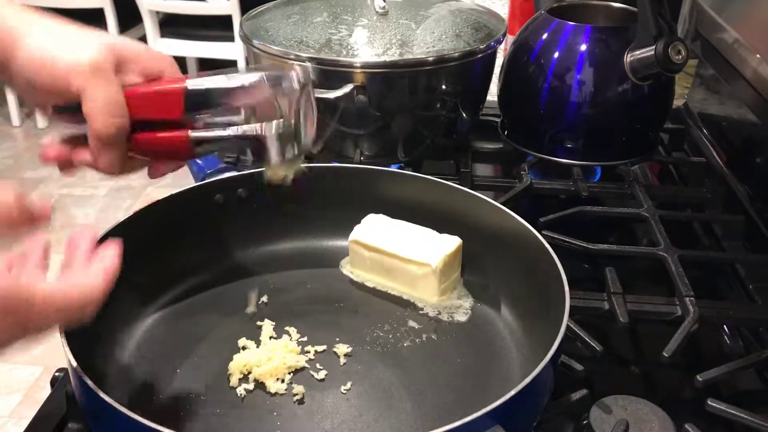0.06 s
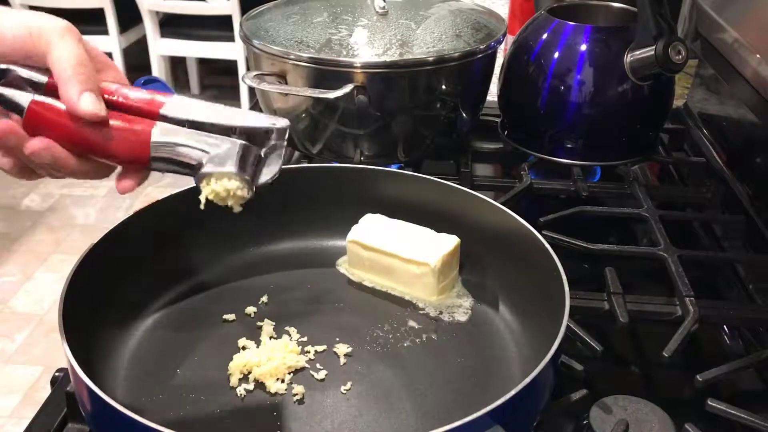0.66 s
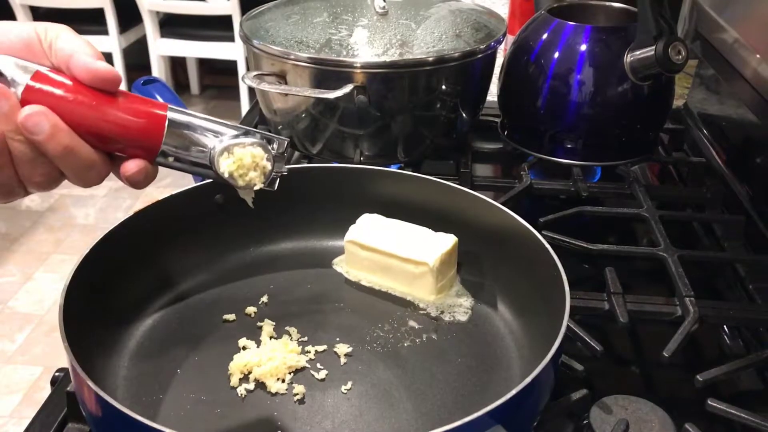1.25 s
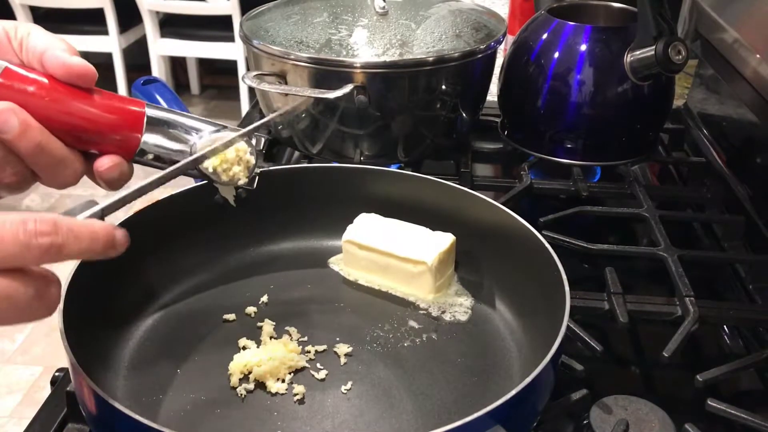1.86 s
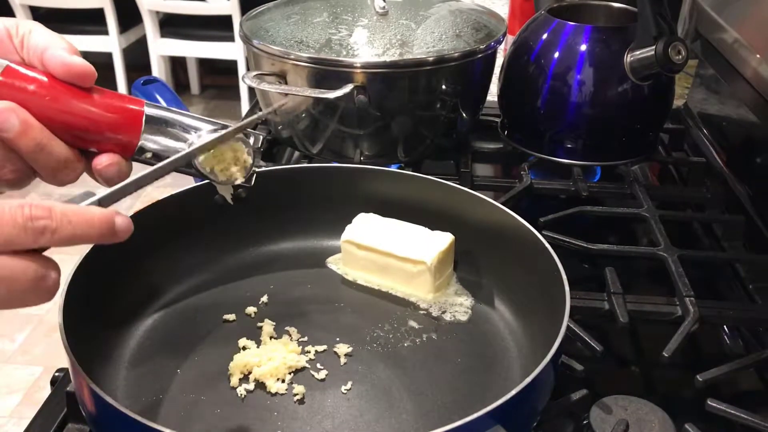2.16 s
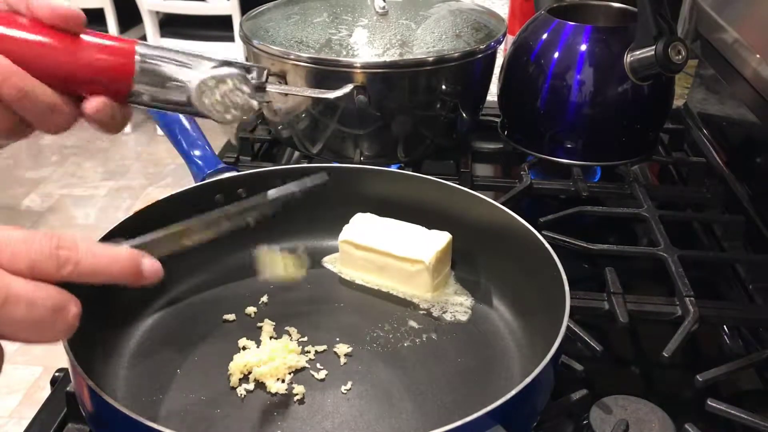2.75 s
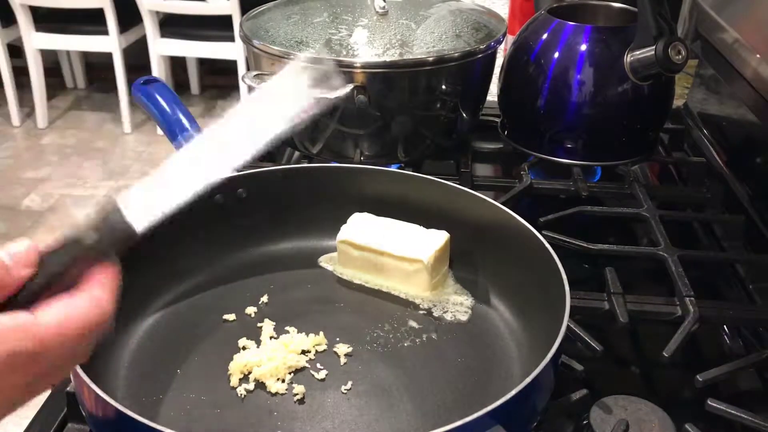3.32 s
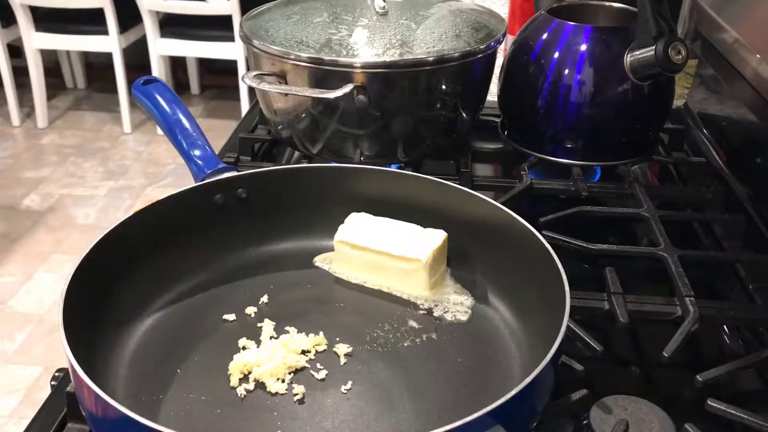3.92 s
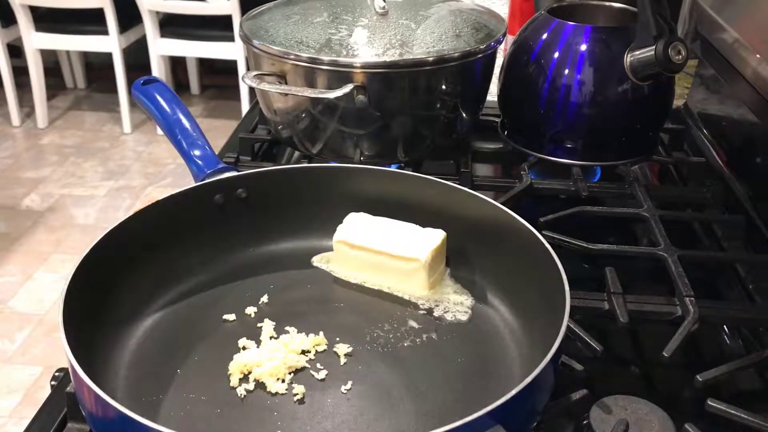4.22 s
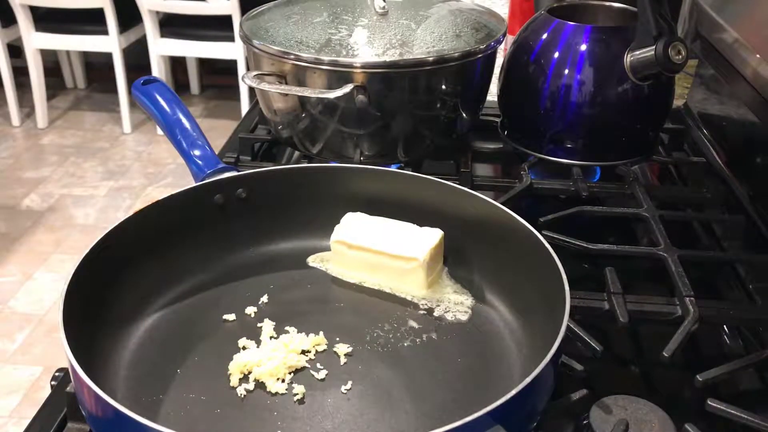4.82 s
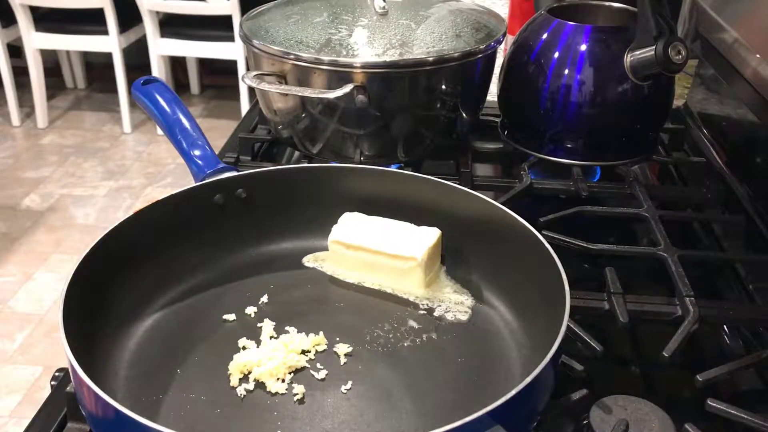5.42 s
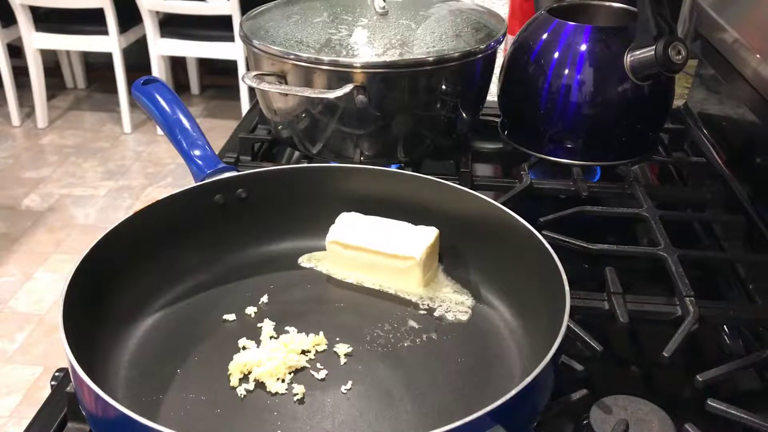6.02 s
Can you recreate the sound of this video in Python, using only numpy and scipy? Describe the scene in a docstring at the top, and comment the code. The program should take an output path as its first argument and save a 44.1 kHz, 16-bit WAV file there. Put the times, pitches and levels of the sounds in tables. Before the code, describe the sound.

Close, quiet handling of a metal garlic press leads to a single sharp clack with a short ring. A knife blade then ticks and scrapes against the press. After a pause, the tools are laid on the counter with a brief, roomier clatter, followed by a light woody tap. Underneath is the soft burner-like rush of a small kitchen and a faint hum that sinks and fades.

```python
"""A small kitchen, one microphone close to a metal garlic press handled over a frying pan on the hob.
The press rubs and ticks as metal slips and catches. Something metal clacks loudly once and rings,
and a knife blade scrapes the garlic off the press's face. A little further off, with more of the room
in the sound, both tools knock and slide on the counter and the knife rocks to rest. Behind it all lie
a soft steady rush and a low hum that sinks and dies away."""
import sys
import numpy as np
from scipy import signal
from scipy.fft import rfft, irfft
from scipy.io import wavfile

SR = 44100
rng = np.random.default_rng(int(sys.argv[2]) if len(sys.argv) > 2 else 0)


def waveform_to_disk(signal):
    """Save audio, clipped to [-1, 1], as 16-bit WAV at the path in sys.argv[1]."""
    frames = np.transpose(np.atleast_2d(signal))
    scaled = np.clip(frames, -1, 1) * 32767
    samples = np.round(scaled).astype(np.int16)
    wavfile.write(sys.argv[1], SR, samples)


N = 267940
T = np.arange(N) / SR
AGE = T[:SR]  # seconds since a contact began


def undb(db):
    """Decibels to gain."""
    return 10 ** (np.asarray(db) / 20)


def unit(x):
    """Scale to an rms of 1."""
    return x / np.sqrt(np.mean(x ** 2))


def along(points, f):
    """Read (Hz, value) points on a log-frequency axis."""
    hz, value = np.transpose(points)
    return np.interp(np.log(f + 1), np.log(hz), value)


def peaks(rows, f):
    """Gain of (Hz, width Hz, dB) resonances, summed in power."""
    return np.sqrt(sum(undb(db) ** 2 / (1 + (2 * (f - hz) / width) ** 2) for hz, width, db in rows))


def boost_db(rows, f):
    """Boost in dB from (Hz, width Hz, dB) resonances and dips."""
    return sum(db / (1 + (2 * (f - hz) / width) ** 2) for hz, width, db in rows)


def treble(f, corner_hz):
    """Smooth step from 0 in the bass to 1 in the treble."""
    return f ** 3 / (f ** 3 + corner_hz ** 3)


def noise(gain, size=SR):
    """Noise of rms 1 whose spectrum follows gain(Hz)."""
    f = np.fft.rfftfreq(size, 1 / SR)
    return unit(irfft(rfft(rng.standard_normal(size)) * gain(f), size))


def fade(t60):
    """Exponential decay, 60 dB down after t60 seconds."""
    return np.exp(-np.log(1000) * AGE / t60)


def onset(rise):
    """Contact force building up over the rise time in seconds."""
    return 1 - np.exp(-AGE / rise)


def ring(modes):
    """Free ringing of (Hz, dB, t60) modes, each taking a cycle or so to build up."""
    return sum(undb(db) * fade(t60) * onset(1 / hz) * np.sin(2 * np.pi * (hz * AGE + rng.random()))
               for hz, db, t60 in modes)


def add(track, s, sound):
    """Mix a sound into the track at s seconds."""
    start = int(s * SR)
    track[start:start + len(sound)] += sound[:N - start]


def stroke(length, swell_db, attack_s=0.0086, release_s=0.0083):
    """Pressure of one stroke: the grip builds, swells or eases along the way, and lets go."""
    swell = undb(swell_db * (np.minimum(AGE / length, 1) - 1))
    return onset(attack_s) * swell * np.exp(-np.maximum(AGE - length, 0) / release_s)


def slips(body, per_s, spread_db=2.5):
    """Stick and slip: random catches of uneven size briefly ring (Hz, width Hz, dB) resonances."""
    catches = rng.random(N) < per_s / SR
    sizes = undb(spread_db * np.minimum(rng.exponential(size=N), 4))
    pulses = catches * sizes * rng.choice([-1, 1], N)
    response = sum(undb(db) * width * np.exp(-np.pi * width * AGE) * np.cos(2 * np.pi * hz * AGE)
                   for hz, width, db in body)
    return unit(signal.fftconvolve(pulses, response)[:N])


def room(x, wet_db):
    """Add the kitchen's diffuse tail, whose treble dies first."""
    # The kitchen's decay. Each row: frequency in Hz, t60 in seconds.
    decay = [(100, 1), (400, 0.76), (1000, 0.48), (3000, 0.43), (7000, 0.36), (15000, 0.2)]
    f = np.fft.rfftfreq(SR, 1 / SR)
    white = rfft(rng.standard_normal(SR))
    edges = np.geomspace(40, 20000, 14)
    tail = sum(irfft(white * (f >= lo) * (f < hi), SR) * fade(along(decay, np.sqrt(lo * hi)))
               for lo, hi in zip(edges, edges[1:]))
    tail *= onset(0.004)
    return x + undb(wet_db) * signal.fftconvolve(x, tail / np.linalg.norm(tail))[:N]


def rush():
    """The kitchen's background: a soft steady rush like a burner's."""
    # Its colour. Each row: frequency in Hz, level in dB.
    colour = [(15, -36), (25, -15.5), (55, -2), (141, -6.5), (212, -8), (354, -11.5), (714, -8.5),
              (775, -9), (911, -10.5), (1260, -16), (2280, -22), (3080, -24.5), (3820, -25), (5000, -30.5),
              (16000, -39)]
    # Its narrow resonances. Each row: centre in Hz, width in Hz, boost in dB.
    resonances = [(112, 11, 2.2), (620, 33, 1.5), (907, 52, 6.6), (1035, 74, 5.4), (2324, 200, 6),
                  (2830, 130, 4), (3880, 150, 5.5), (6540, 800, 3.6)]
    return undb(-64.5) * noise(lambda f: undb(along(colour, f) + boost_db(resonances, f)), size=N)


def hum(start_hz=54.3, lowest_hz=30.95, sinks_at_s=2.77, sag_hz_per_s=34, fade_db_per_s=15):
    """A low hum and its octave waver, then sink and die away."""
    # The hum's swells. Each row: time in seconds, relative level in dB.
    swells = [(0.0, -78), (0.22, -83), (0.39, -66.5), (0.79, -78), (0.86, -65.5), (1.26, -69), (1.41, -51),
              (1.81, -64.5), (2.14, -62.5), (2.88, -73), (2.9, -63.5), (3.8, -76)]
    s, db = np.transpose(swells)
    level_db = np.interp(T, s, db) - 1 - fade_db_per_s * np.maximum(T - s[-1], 0)
    hz = np.maximum(start_hz - sag_hz_per_s * np.maximum(T - sinks_at_s, 0), lowest_hz)
    waver = noise(lambda f: 1 / (1 + (f / 5) ** 4), size=N)
    phase = 2 * np.pi * np.cumsum(hz * (1 + 0.021 * waver)) / SR
    tone = unit(np.sin(phase) + undb(-7) * np.sin(2 * phase))
    return tone * undb(level_db + 0.8 * waver)


def woody_tap():
    """One last light, woody tap, off microphone, as something is picked up."""
    body = [(510, 170, 3), (1450, 250, 3), (1650, 300, 3.5), (2300, 300, -11)]
    tap = noise(lambda f: peaks(body, f) * (1 - treble(f, 3900)))
    out = np.zeros(N)
    add(out, 5.9995, undb(-50) * tap * onset(0.00034) * fade(0.077))
    return room(out, wet_db=-6.5)


def counter_contact(treble_db, rise, part, landing_db=21.5, flat_db=2.5):
    """One contact with the counter: the board thuds, the loose press rattles and the knife rings."""
    # The counter's colour. Each row: frequency in Hz, level in dB.
    colour = [(35, -20.5), (60, -11), (198, -12.5), (323, -9), (389, -3.5), (427, -9.5), (579, -5.5),
              (1280, -7), (2350, -7.5), (4640, -14.5), (5720, -18.5), (6740, -18), (7570, -22.5),
              (9350, -23.5), (16000, -34)]
    # Resonances of counter and press. Each row: centre in Hz, width in Hz, gain in dB.
    board_peaks = [(430, 50, -5), (587, 60, 5.5), (720, 80, -3), (920, 110, 4), (1140, 110, 4),
                   (1410, 110, 1), (2060, 60, 4), (2280, 70, 4), (2900, 60, 4)]
    thud_peaks = [(85, 60, -2), (195, 110, 0), (380, 60, -1.5), (560, 130, 0)]
    handle_peaks = [(1560, 150, -2), (2070, 220, -1), (2300, 220, 0), (2850, 250, -2), (4900, 600, -6),
                    (6600, 550, -3), (9200, 1000, -7), (12000, 800, -11), (14300, 2000, -11)]
    head_peaks = [(920, 100, 0), (1192, 100, 0), (2000, 150, -2), (2877, 150, -2), (4200, 700, -4.5),
                  (5130, 200, 1), (6150, 600, -6.5)]
    # The blade's modes. Each row: frequency in Hz, level in dB, t60 in seconds.
    knife_modes = [(1310, -5, .35), (1431, -3.5, .35), (2045, -9, .25), (2159, -8, .25), (2289, -5, .25),
                   (2995, -4, .25), (3470, -7, .35), (4452, -11, .3), (6540, -15, .25)]
    handle_db = -16.5 + landing_db * (part == "handle")
    head_db = -24.5 + landing_db * (part == "head")
    thud_db = -5.5 + flat_db * (part == "flat")
    board = noise(lambda f: treble(f, 41.8)
                  * undb(along(colour, f) + boost_db(board_peaks, f) + treble_db * treble(f, 3900)))
    # Squared resonances have steep flanks and leave dark valleys.
    handle = undb(handle_db) * noise(lambda f: peaks(handle_peaks, f) ** 2) * fade(0.11)
    head = undb(head_db) * noise(lambda f: peaks(head_peaks, f) ** 2) * fade(0.23)
    thud = undb(thud_db) * noise(lambda f: peaks(thud_peaks, f) ** 2) * fade(0.071)
    knife = undb(-33) * ring(knife_modes)
    return onset(rise) * (board * fade(0.16) + handle + head + knife + thud)


def sliding():
    """The tools drag on the counter: sparse catches rattle the board and one resonance of the metal."""
    # Each row: start and length in seconds, level and swell in dB, metal resonance in Hz.
    slides = [(4.995, 0.063, -54, -3.5, 2430), (5.085, 0.065, -59, 2, 2650), (5.163, 0.036, -54, -5, 3570),
              (5.282, .15, -66.5, -2.5, 3160)]
    board = [(520, 200, -3), (1140, 110, 0), (1410, 90, -1)]
    out = np.zeros(N)
    for s, length, db, swell_db, hz in slides:
        pressure = np.zeros(N)
        add(pressure, s, undb(db) * stroke(length, swell_db))
        out += pressure * slips(board + [(hz, 130, 1)], per_s=260)
    return out


def rocking(rise=0.0051, sag_per_s=0.15):
    """The knife rocks to rest, buzzing lower at each touch as the contact moves along the blade."""
    # Each row: start in seconds, level in dB.
    touches = [(5.196, -54.5), (5.27, -51.5), (5.325, -57), (5.393, -55.5)]
    # The blade's buzz at the second touch. Each row: centre in Hz, width in Hz, gain in dB.
    blade = [(1430, 60, 1), (2250, 130, -1), (2790, 70, -3), (3170, 60, -3.5), (3520, 90, -2.5),
             (4560, 130, -2), (5130, 70, -7), (6950, 260, -8)]
    out = np.zeros(N)
    for s, db in touches:
        pitch = 1 - sag_per_s * (s - touches[1][0])
        buzz = noise(lambda f: peaks(blade, f / pitch) ** 2) * onset(rise) * fade(0.27)
        knock = counter_contact(treble_db=1, rise=rise, part="knife")
        add(out, s, undb(db) * (knock + undb(-3) * buzz))
    return out


def tools_laid_down():
    """The tools land, slide and rock on the counter, far enough off for the room to come through."""
    # Each row: start in seconds, level in dB, treble in dB, rise in seconds, part that lands.
    knocks = [(4.572, -51, 3, 0.017, "side"), (4.631, -40.5, -5, 0.0016, "handle"),
              (4.641, -35.5, -9, 0.00071, "flat"), (4.666, -45, 3, .003, "flat"),
              (4.774, -46, -21, 0.0038, "side"), (4.811, -43.5, -8, 0.0076, "head"),
              (4.917, -45.5, 23, 0.0023, "side"), (4.923, -47.5, -58, 0.0013, "flat"),
              (4.964, -48.5, 3, 0.0052, "side"), (4.988, -35, -45, 0.013, "side"),
              (5.008, -46.5, 1, 0.0074, "side"), (5.051, -45, -5, 0.0035, "side"),
              (5.105, -49, -8, 0.0044, "side"), (5.146, -37.5, 1.5, 0.012, "side"),
              (5.160, -48.5, -18, 0.0066, "head"), (5.82, -60.5, 0, 0.01, "side"),
              (6.028, -60.5, 5, 0.0061, "side")]
    out = np.zeros(N)
    for s, db, treble_db, rise, part in knocks:
        add(out, s, undb(db) * counter_contact(treble_db, rise, part))
    return room(out + sliding() + rocking(), wet_db=-7.5)


def bumps():
    """Soft contacts through the hand reach only the press's low resonances; firmer ones add a knock."""
    # Each row: start in seconds, level in dB, t60 in seconds, knock in dB.
    contacts = [(0.6454, -42, 0.025, 1), (0.651, -49, 0.058, -8), (.855, -55.5, 0.18, -14),
                (0.933, -52.5, 0.2, -17), (0.99, -56, .12, -16), (4.002, -61.5, 0.31, 6),
                (4.022, -63, 0.3, 8)]
    out = np.zeros(N)
    for s, db, t60, knock_db in contacts:
        body = [(115, 53, 0), (181, 37, 0), (570, 260, knock_db), (1286, 400, knock_db - 13)]
        thump = noise(lambda f: peaks(body, f) * treble(f, 70) * (1 - treble(f, 2600)))
        add(out, s, undb(db) * thump * onset(0.0009) * fade(t60))
    return room(out, wet_db=-17)


def rubbing():
    """Dense tiny slips hiss in patches in the press's high resonances; under the blade it squeaks."""
    # Each row: start and length in seconds, level, swell and squeak in dB, squeak pitch in Hz.
    rubs = [(0.849, 0.044, -70.5, -1, -17, 4700), (0.917, 0.06, -57, 4, -28, 4700),
            (1.056, 0.071, -67, 10, -19, 4700), (1.352, 0.36, -75, -0.5, -8, 4730),
            (1.877, 0.028, -79, 1.5, -20, 4700), (2.381, .105, -74, 6, 2.5, 4590),
            (2.573, 0.052, -58.5, 10, -2, 2870)]
    body = [(1365, 300, -8), (2270, 300, -5.5), (5140, 1470, -11),
            (8900, 460, -0.5), (10500, 4000, -6.5), (13300, 2500, -6.5)]
    patches = undb(1.8 * noise(lambda f: 1 / (1 + (f / 80) ** 2), size=N) - 0.4)
    crackle = slips(body, per_s=4000)
    out = np.zeros(N)
    for s, length, db, swell_db, squeak_db, squeak_hz in rubs:
        pressure = np.zeros(N)
        add(pressure, s, undb(db) * stroke(length, swell_db))
        squeak = noise(lambda f: peaks([(squeak_hz, 420, 0)], f) ** 2)
        add(out, s, undb(db + squeak_db) * stroke(length, swell_db) * squeak)
        out += pressure * crackle
    return room(out * patches, wet_db=-12.5)


def knife_tap():
    """The flat of the knife meets the press, close up: a dry tick with a faint rebound."""
    # Each row: start in seconds, level in dB.
    taps = [(2.168, -44), (2.177, -52)]
    # Blade and press meeting flat. Each row: centre in Hz, width in Hz, gain in dB.
    body = [(1290, 200, -.5), (1620, 180, -1), (1940, 220, 1.5), (2450, 200, -5), (3550, 900, -5),
            (4780, 350, -4.5), (5220, 300, -5.5), (6400, 500, -8), (8600, 900, -7), (13000, 6000, -9)]
    out = np.zeros(N)
    for s, db in taps:
        tick = noise(lambda f: peaks(body, f) ** 2)
        add(out, s, undb(db) * tick * onset(0.0002) * fade(0.029))
    return room(out, wet_db=-20)


def ticks(scatter_db=2, damped_t60=0.03):
    """Edge and hinge catch and let go, damped by the hand; the colour shifts with the contact point."""
    # Each row: start in seconds, level in dB, treble in dB, lowest resonance in Hz.
    catches = [(0.207, -59, 8, 1870), (0.9315, -52.5, -31, 1290), (1.145, -43.5, 19, 1220),
               (1.1631, -45, 15.5, 1248), (2.485, -53.5, 2, 1620), (2.502, -58, 10, 1640),
               (2.511, -44, 4, 1650), (2.558, -48.5, -1, 1660), (2.562, -50, -8, 1620),
               (2.583, -53, -4, 1630), (2.587, -41, -1, 1650), (2.619, -45.5, 2, 1740),
               (2.6282, -46.5, 6, 1720), (2.906, -56.5, 6, 1640), (3.068, -65.5, 7.5, 1915),
               (3.35, -66, 13, 1830), (4.476, -62, 25.5, 1890)]
    # The blade on the press. Each row: multiple of the lowest resonance, width in Hz, gain in dB.
    blade = [(1, 170, 7), (1.28, 200, -1), (1.7, 260, .5), (2.72, 500, -3), (3.25, 360, -6), (3.9, 180, -9),
             (5.08, 350, -5), (5.6, 300, -10), (6.6, 600, -10), (8.1, 900, -12), (11, 2000, -13)]
    out = np.zeros(N)
    for s, db, treble_db, hz in catches:
        body = [(hz * multiple, width, mode_db + scatter_db * rng.standard_normal())
                for multiple, width, mode_db in blade]
        tick = noise(lambda f: peaks(body, f) * treble(f, 1172) * undb(treble_db * treble(f, 4100)))
        add(out, s, undb(db) * tick * onset(0.0004) * fade(damped_t60))
    return room(out, wet_db=-16)


def clack():
    """Something metal strikes and rebounds: a hard crack, ringing and a slower thud from the hob."""
    # Each row: start in seconds, crack level, treble and ring level in dB, crack t60 in seconds.
    strikes = [(1.294, -16.5, 7.5, -32, 0.033), (1.3015, -26, -19, -54.5, .045),
               (1.3082, -24.5, -5, -41, 0.038), (1.319, -33, -16, -55.5, 0.037)]
    # The crack's colour. Each row: frequency in Hz, level in dB.
    colour = [(59, -48), (100, -8), (350, -4.5), (736, -11.5), (1760, -1), (2130, -11), (2750, -7),
              (3320, -3.5), (3620, -5.5), (6990, -6.5), (8640, -12), (14700, -22.5), (16000, -24)]
    # Its broad resonances and dips. Each row: centre in Hz, width in Hz, boost in dB.
    resonances = [(1043.6, 140, 6), (1610, 180, -2.5), (2000, 150, -2), (4120, 500, 5.5),
                  (14830, 1700, 4.5)]
    # The struck metal's modes. Each row: frequency in Hz, level in dB, t60 in seconds.
    metal_modes = [(110, -24, .6), (156, -15, .45), (207, -19, .6), (280, -12, .25), (350, -12, .22),
                   (388, -10, .3), (479, -17, .55), (592, -15, .4), (690, -10, .35), (942, -17, .7),
                   (1017, -13, .8), (1045, -6, .12), (1082, -12, .45), (1125, -12, .48), (1276, -13, .33),
                   (1450, -13, .22), (1795, -13, .18), (1890, -12, .18), (2444, -15, .13), (2875, -11, .1),
                   (3278, -7, .12), (3343, -15, .18), (3607, -16, .15), (4060, -3, .07), (5100, -7, .11),
                   (5168, -9, .12), (5927, -20, .13), (8060, -16, .08), (8580, -18, .08), (9430, -20, .1)]
    out = np.zeros(N)
    for s, db, treble_db, ring_db, t60 in strikes:
        crack = noise(lambda f: treble(f, 210)
                      * undb(along(colour, f) + boost_db(resonances, f) + treble_db * treble(f, 4400)))
        add(out, s, undb(db) * crack * onset(0.000078) * fade(t60))
        add(out, s, undb(ring_db) * ring(metal_modes))
    hob = [(129.6, 90, -2.5), (315, 231, -5.5), (672, 330, -5), (1130, 300, -2.5)]
    thud = noise(lambda f: peaks(hob, f) * (1 - treble(f, 1500)))
    add(out, strikes[0][0], undb(-33.5) * thud * onset(0.015) * fade(0.36))
    return room(out, wet_db=-16)


def scene():
    """One microphone hears metal close up, the counter further off and the kitchen behind."""
    close = clack() + ticks() + knife_tap() + rubbing() + bumps()
    further_off = tools_laid_down() + woody_tap()
    return (close + further_off + rush() + hum())[None]


def record(dry, ceiling=0.36, low_cut_hz=32, top_hz=16200):
    """The recorder rounds the one loud peak, drops the deepest rumble and cuts the top steeply."""
    rounded = ceiling * np.tanh(dry / ceiling)
    low_cut = signal.butter(3, low_cut_hz, "high", fs=SR, output="sos")
    top_cut = signal.ellip(10, 0.2, 80, top_hz, fs=SR, output="sos")
    return signal.sosfilt(top_cut, signal.sosfilt(low_cut, rounded))


dry = scene()
out = record(dry)
waveform_to_disk(out)
```